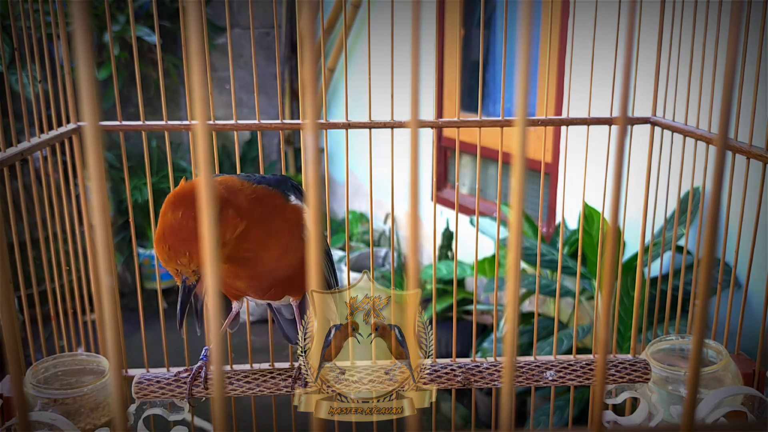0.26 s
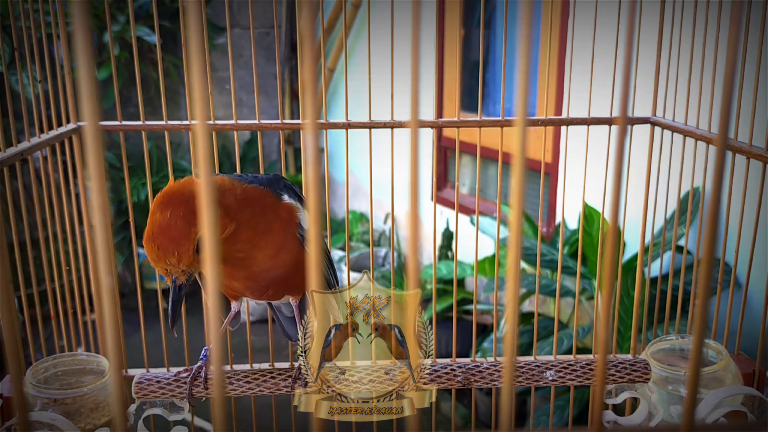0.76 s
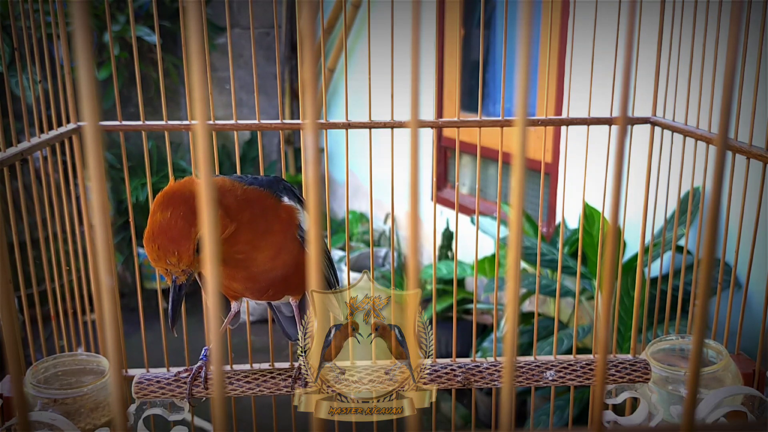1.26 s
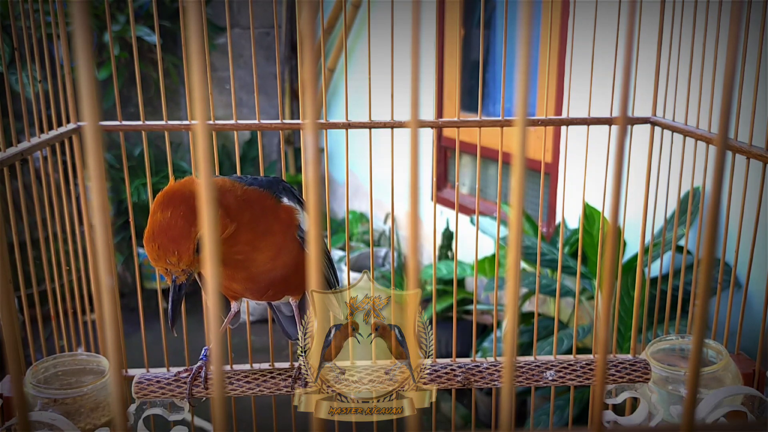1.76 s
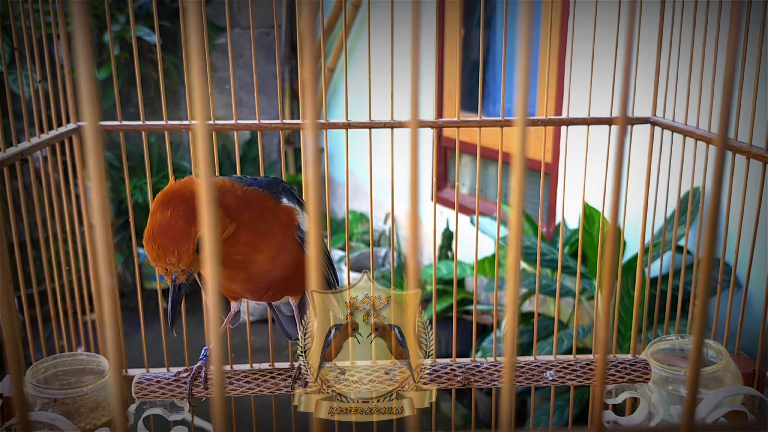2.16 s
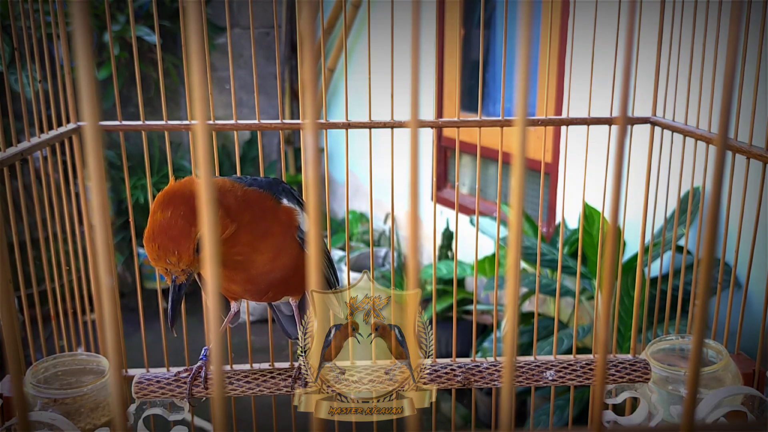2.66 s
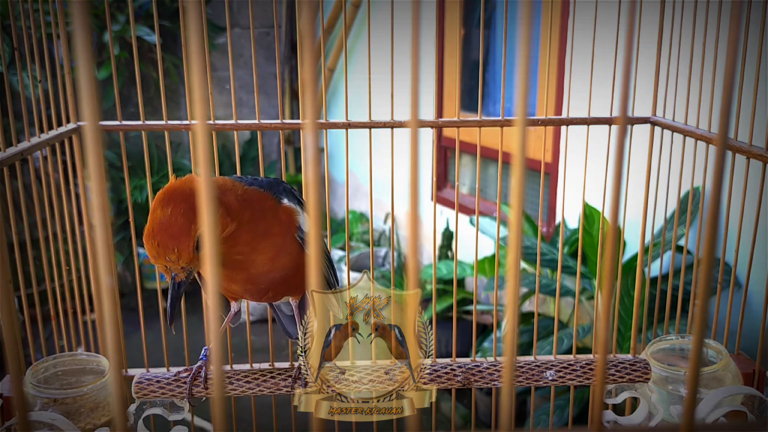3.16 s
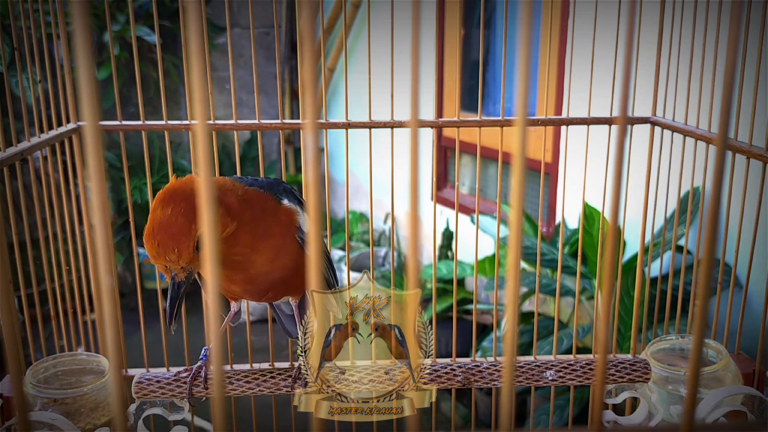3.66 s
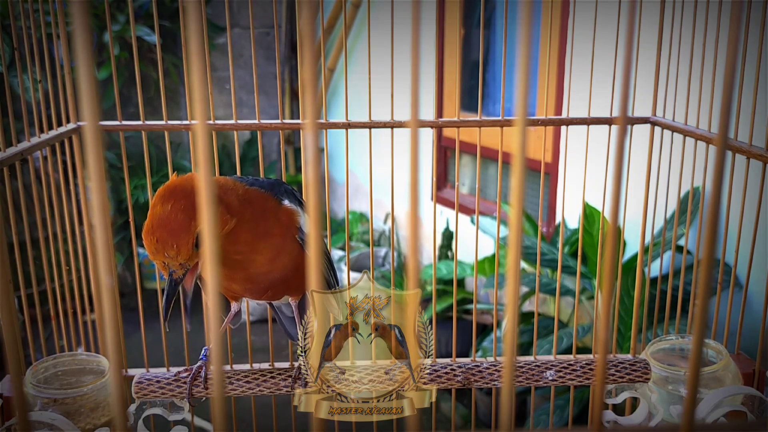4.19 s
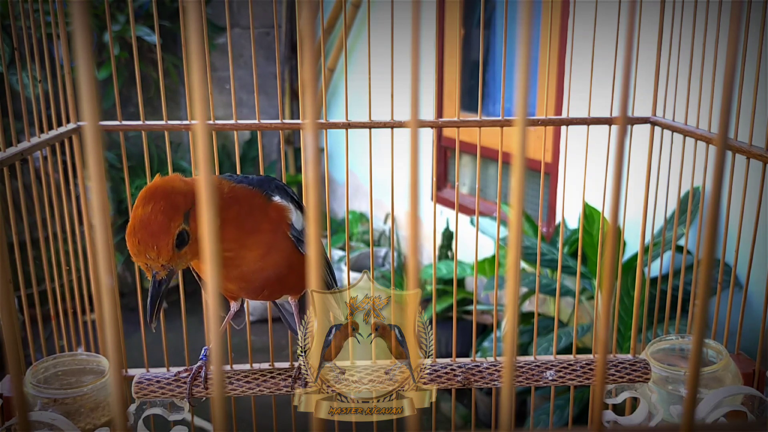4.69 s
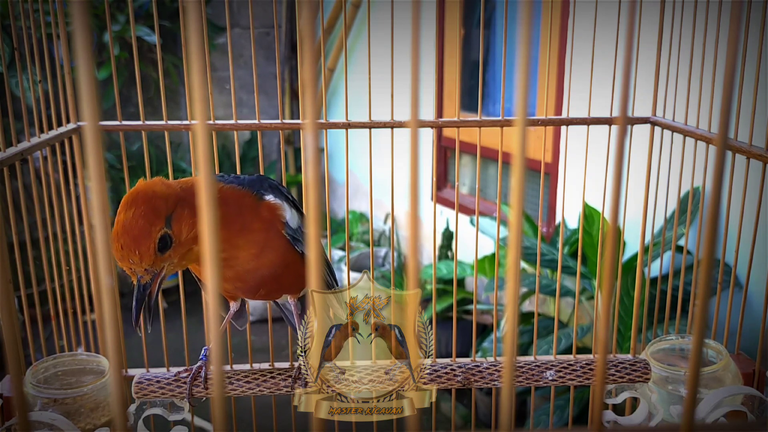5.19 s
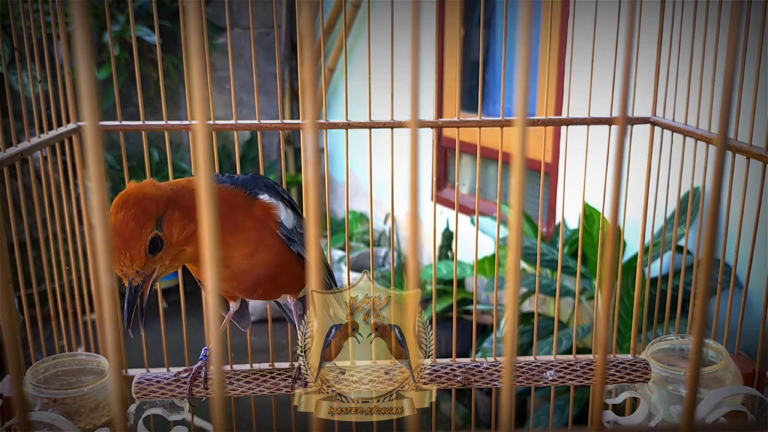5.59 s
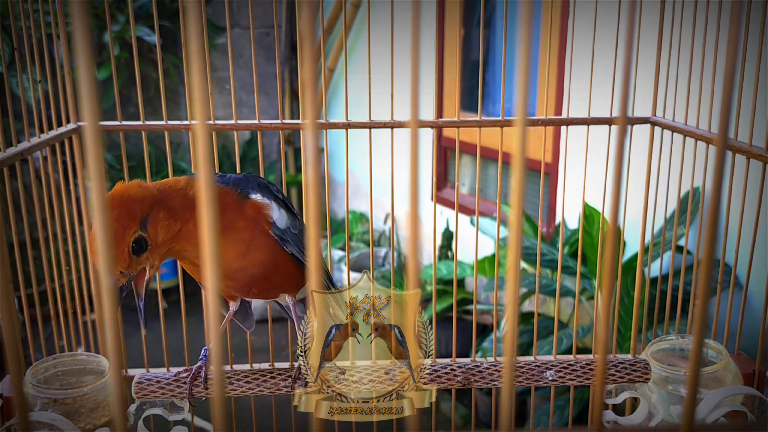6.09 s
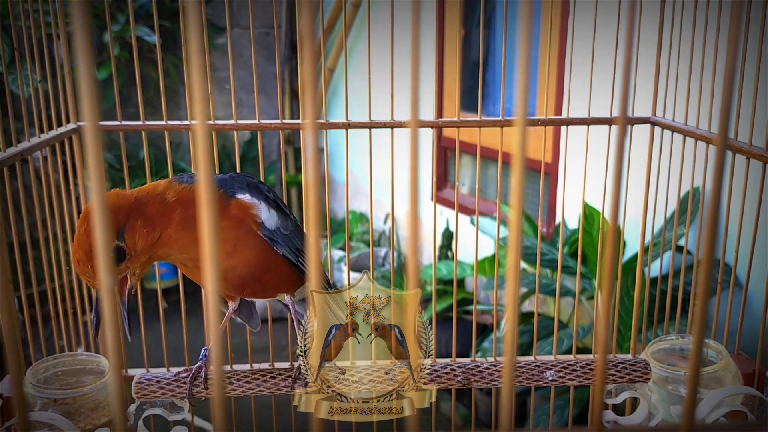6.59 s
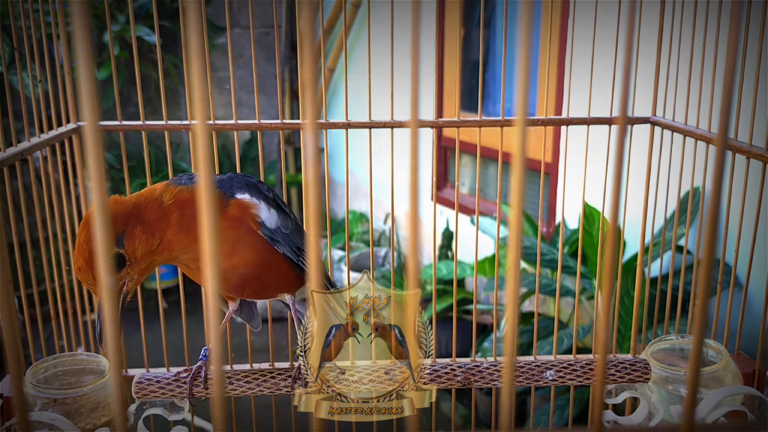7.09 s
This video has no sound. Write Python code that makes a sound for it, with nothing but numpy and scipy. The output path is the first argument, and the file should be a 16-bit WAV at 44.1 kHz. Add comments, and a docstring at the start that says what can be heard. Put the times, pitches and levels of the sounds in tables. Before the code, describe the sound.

A caged thrush very close to the microphone opens with a loud, high falling whistle, then stays silent for over two seconds while faint distant birds and soft wind bumps are heard. It resumes with quick piercing chirps and clicks, then falling sweeps, a fast warble and separate low trill notes. A far rooster crows midway. The walled yard adds short echoes over a quiet hush.

```python
"""A long whistle falls over a soft hush: a caged thrush sings close by in a walled yard.
Its later glides, quick sweeps and low trill are gliding sines with overtones, coloured by the throat and echoed.
Far roosters and songbirds call, as gliding sines too; light wind, made of low noise, bumps the microphone.
The hush is a sum of noise bands; a limiter ducks the whole scene for a moment after the loudest notes."""
import sys
import numpy as np
from scipy import signal
from scipy.io import wavfile
from scipy.ndimage import uniform_filter1d, minimum_filter1d

SR = 44100
rng = np.random.default_rng(int(sys.argv[2]) if len(sys.argv) > 2 else 0)


def unload_audio(sound):
    """Save the sound as a 16-bit wav file, at the path given as the first command line argument."""
    columns = np.transpose(np.atleast_2d(sound))
    # keep every value between -1 and 1, then stretch to whole-number steps
    steps = np.round(np.clip(columns, -1, 1) * 32767)
    wavfile.write(sys.argv[1], SR, steps.astype(np.int16))


def gain_from_db(level_db):
    """Convert decibel levels to linear amplitude factors (20 dB per decade)."""
    decades = np.asarray(level_db, float) / 20
    return 10 ** decades


N = 323694

# Levels in dB are relative: throat, echoes and later gains still act on them.

# Spectrum of the neighbourhood's hush. Each row: frequency in Hz, density in dB per Hz.
HUSH_SPECTRUM = [(12, -29), (20, -3), (145, -12), (247, -8), (477, -10.5), (555, -10.5), (615, -8.5),
                 (855, -5.5), (1160, -11.5), (1570, -13), (2820, -29.5), (5310, -18), (7390, -16.5),
                 (7970, 3), (8600, -18), (11200, -65), (18900, -120)]
# Course of the hush. Each row: time in seconds, level in dB.
HUSH_COURSE = [(0, -46), (1, -47), (3, -46.5), (5, -45), (6.4, -50), (6.8, -41.5), (7.34, -42)]

# Throat and beak pass high tones best. Each row: frequency in Hz, gain in dB.
THROAT_RESPONSE = [(1500, -41.5), (2200, -35.5), (3000, -28.5), (3600, -21.5), (4200, -10.5), (5000, -11),
                   (6000, -4.5), (7000, -5.5), (7600, -0.5), (8050, -1), (8500, -12)]
# Echoes off the cage bars and floor; the last, at 11 ms, comes off a nearby wall. Each row: delay in seconds,
# signed gain.
CAGE_ECHOES = [(.0013, -0.79), (.0029, 0.15), (.0047, 0.031), (.0074, 0.042), (0.0111, .22)]
# Long falling whistle. Each row: time in seconds, pitch in Hz, level in dB.
WHISTLE_CURVE = [(0.002, 7040, 6.5), (0.065, 6830, -3), (0.178, 6070, 3.5), (0.194, 6080, 1),
                 (0.21, 5965, -11), (0.268, 5720, -5), (0.359, 5630, -2), (0.418, 5480, -28)]

# How each kind of note bends and swells: top_at and loud_at are shares of its length, end_ratio is
# end pitch over turning pitch, bend is an exponent, attack_db and fade_db are the rise and fall in dB.
ARC_SHAPE = dict(top_at=0.34, end_ratio=0.71, bend=2.5, loud_at=0.19, attack_db=31.5, fade_db=23.5)
GLIDE_SHAPE = dict(top_at=0.67, end_ratio=0.96, bend=1.5, loud_at=0.51, attack_db=22, fade_db=14.5)
TICK_SHAPE = dict(top_at=.25, end_ratio=.53, bend=2.1, loud_at=.62, attack_db=8, fade_db=7)
HOOK_SHAPE = dict(top_at=0.14, end_ratio=0.41, bend=.62, loud_at=0.067, attack_db=19.5, fade_db=11)
SWELL_SHAPE = dict(top_at=1, end_ratio=1, bend=1.5, loud_at=0.99, attack_db=4.5, fade_db=13.5)
FAR_SHAPE = dict(top_at=.9, end_ratio=0.9, bend=0.86, loud_at=0.09, attack_db=0, fade_db=19)

# Thrush notes of each kind. Each row: start in seconds, length in seconds, start pitch in Hz,
# turning pitch in Hz, level in dB.
ARC_NOTES = [(3.439, .05, 3190, 5000, -6), (3.545, 0.023, 5850, 7390, 4), (3.642, 0.02, 6390, 7580, 6),
             (5.918, 0.027, 4215, 5410, -5.5)]
GLIDE_NOTES = [(3.062, 0.02, 6300, 7526, 6), (3.088, 0.021, 7180, 7490, -0.5),
               (3.444, 0.0073, 7220, 6980, -11.5), (4.018, .013, 5770, 6110, -2),
               (4.187, 0.012, 7100, 7000, 6), (4.351, 0.0079, 7080, 7220, 10),
               (4.372, 0.0031, 4900, 5835, -3), (5.245, 0.0094, 3750, 4460, -10.5),
               (6.469, 0.018, 3800, 3640, -22.5), (6.434, 0.0052, 7620, 7960, -8.5),
               (6.446, 0.0076, 8030, 7960, -8.5), (6.468, .02, 7700, 7216, -16.5),
               (6.436, 0.0076, 2750, 2380, -14.5), (6.472, 0.0092, 2390, 2370, -27)]
TICK_NOTES = [(3.904, 0.021, 2975, 3250, -10), (4.075, .016, 3700, 3150, -13.5),
              (4.25, 0.0063, 2407, 3020, -3.5)]
HOOK_NOTES = [(5.92, 0.14, 3580, 4276, -22), (6.04, 0.11, 3750, 4460, -15), (6.2, 0.1, 4400, 4420, -16.5)]
SWELL_NOTES = [(3.815, 0.0059, 2060, 2500, -9), (3.927, 0.006, 1485, 1634, 3),
               (5.848, .037, 1591, 3162, -6)]
# Runs sung once and a second voice above a hook, one list each.
# Each row: time in seconds, pitch in Hz, level in dB, overtone boost in dB.
RUN_CURVES = [
    [(2.902, 2780, -36.5, -12), (2.91, 3814, -14, 15), (2.92, 5000, -16, -4), (2.93, 5820, -8, -10),
     (2.94, 6110, -8, -18), (2.947, 6720, -36, -23)],
    [(3.822, 1623, -11, -11.5), (3.828, 2080, -15, 2), (3.833, 2494, -11, 10.5), (3.84, 3100, -10.5, 12.5),
     (3.85, 2980, -17, 15.5), (3.858, 3735, -10.5, 10), (3.864, 3864, -11, 12.5), (3.875, 5670, -9, -5)],
    [(4.672, 2577, -40, 17.5), (4.68, 3225, -13.5, 10.5), (4.687, 3565, -19, 37),
     (4.692, 3088, -75.5, 12.5), (4.697, 3616, -45, 37.5), (4.705, 3000, -14.5, 20), (4.72, 3463, -17, 4.5),
     (4.73, 3940, -19.5, 7)],
    [(6.04, 6770, -10, -45), (6.05, 5377, 2.5, -34), (6.058, 6220, -7.5, -40), (6.066, 4480, -7.5, -43)],
    [(6.197, 7690, -0.5, -37), (6.205, 6666, -3, -27), (6.222, 6450, -4, -34), (6.235, 4140, -17, -38)],
    [(6.434, 5380, -29, -26), (6.44, 5734, 1.5, -33), (6.45, 5000, -6.5, -45), (6.465, 4807, -11.5, -29),
     (6.485, 4936, -14, -35), (6.489, 4860, -1.5, -44)],
    [(6.489, 4210, -8.5, 17), (6.494, 3784, -8, 21), (6.499, 3790, -18, 8.5)],
]
# Climbing chirp. Each row: time after its start in seconds, pitch in Hz, level in dB, overtone boost in dB.
CHIRP_CURVE = [(0, 2246, -33, 0.5), (.006, 3303, -7, 12.5), (.014, 3500, -36, 26.5),
               (.023, 3865, -22, 35.5), (.031, 5210, -2.5, -1)]
# Chirps sung. Each row: start in seconds, length in seconds, level in dB.
CHIRP_NOTES = [(3.986, .024, 0), (4.157, 0.026, -2), (4.323, .028, 4)]
# Falling sweeps. Each row: start in seconds, start pitch in Hz, attack in seconds, level in dB,
# overtone boost in dB.
FALL_NOTES = [(5.174, 6247, 0.0029, -1, 2), (5.26, 6185, 0.022, 3, -24.5),
              (5.361, 6320, 0.035, -2.5, -32.5), (5.56, 7400, 0.0023, -6.5, -15.5),
              (5.65, 5910, 0.013, -3, -33)]
# Turning points of the warble. Each row: time in seconds, pitch in Hz, level in dB, overtone boost in dB.
WARBLE_TURNS = [(6.499, 3860, -11, -18), (6.516, 4483, -1, -4.5), (6.533, 3623, -1, -14.5),
                (6.557, 4534, -5, -35.5), (6.572, 3370, -8.5, -21), (6.592, 4113, -7, -35),
                (6.607, 4410, -12.5, -44.5), (6.624, 3025, -2.5, -21), (6.65, 4510, -16, -50),
                (6.662, 3760, -19.5, -33)]
# Trill notes. Each row: start in seconds, start pitch in Hz, held pitch in Hz, end pitch in Hz, level in dB.
TRILL_NOTES = [(6.72, 2647, 2066, 1670, -6.5), (6.843, 2418, 2002, 1735, -6.5),
               (6.967, 2357, 1984, 1693, -7.5), (7.097, 2308, 2014, 1772, -4.5),
               (7.248, 2545, 2025, 1997, -7)]
# Swelling of a trill note. Each row: share of its length, level in dB.
TRILL_SWELL = [(0, -2.5), (.12, 2), (.36, -9.5), (.58, -1), (.75, -3.5), (1, -11.5)]

# Overtones of each kind before the throat: dB of partial 1, 2, ..
ARC_DB, TICK_DB, HOOK_DB = [3.5, -29], [3.5, -5, 4], [2.5, 28.5]
TRILL_DB, SWELL_DB, CHIRP_DB, RUN_DB = [2.5, -9.5, -4.5, 3.5], [2.5, -19.5, -22, -37.5], [1.5, -1.5, -21], [0, -4, -0.5]
HOOK_THINS_DB = -83.5  # change of the hook's overtone as it falls

# Long crows of far roosters. Each row: time in seconds, pitch in Hz, level in dB.
LOW_CROW_CURVE = [(0.03, 321, -67), (0.15, 319.4, -45.5), (0.3, 313.5, -52.5), (0.55, 321.3, -56.5),
                  (0.739, 323, -60)]
THIN_CROW_CURVE = [(1.448, 1610, -60.5), (1.8, 1627, -50.5), (2.101, 1577, -63), (2.4, 1548, -59),
                   (2.899, 1480, -58)]
# Each row: time in seconds, pitch in Hz, level in dB, overtone boost in dB.
HIGH_CROW_CURVE = [(4.23, 756, -59, 15.5), (4.318, 748, -43.5, 10.5), (4.45, 710, -41.5, 6.5),
                   (4.55, 742, -47, 16), (4.651, 771.4, -30, -3), (4.801, 766, -43.5, 7),
                   (4.92, 784, -45, -6), (5.018, 720, -37.5, 5), (5.098, 693, -32.5, -4),
                   (5.181, 682, -23, -15), (5.269, 683, -28, 0), (5.32, 634, -59, 20),
                   (5.42, 626, -47.5, 1)]
LOW_CROW_DB, HIGH_CROW_DB = [-51.5, -3, 4, -6.5, -1, -28], [-2.5, -8.5, -19, -29]  # dB of partial 1, 2, ..
# Breath noise at the hoarse end of the first crow. Each row: time in seconds, level in dB.
BREATH_COURSE = [(.2, -68.5), (.32, -55), (.55, -55), (.72, -56), (.82, -84)]
# Short crow syllables. Each row: start in seconds, length in seconds, start pitch in Hz,
# end pitch in Hz, level in dB.
CLUCK_NOTES = [(3.95, 0.067, 1040, 1170, -46.5), (4.08, 0.06, 1200, 1230, -53.5),
               (4.42, 0.12, 1190, 1230, -47), (4.82, 0.18, 1130, 1200, -49.5),
               (5.24, 0.15, 1700, 1640, -51)]

# Far songbirds. Each row: start in seconds, length in seconds, start pitch in Hz,
# turning pitch in Hz, level in dB.
FAR_NOTES = [(0.12, 0.13, 4200, 3270, -45.5), (0.41, .13, 4145, 3194, -49), (0.69, 0.036, 5780, 3380, -46),
             (0.692, 0.035, 4550, 4400, -52), (0.78, 0.046, 3330, 4120, -51),
             (0.83, 0.034, 4000, 3750, -52), (0.95, 0.053, 4840, 4970, -37.5),
             (1.015, 0.044, 4530, 4490, -39), (1.06, 0.073, 4400, 4630, -43),
             (1.12, 0.098, 4850, 4920, -38.5), (1.23, 0.066, 4400, 4200, -47.5),
             (1.7, 0.24, 3100, 2560, -62.5), (1.86, 0.25, 3285, 3230, -58), (2.45, 0.13, 3540, 3100, -65.5),
             (5.09, 0.14, 4210, 3370, -47.5)]

# Wind on the microphone. Each row: start in seconds (the peak comes 0.03 s later), level in dB.
WIND_BUMPS = [(0.501, -60), (0.702, -47), (1.446, -38), (1.597, -35), (2.328, -40.5), (2.596, -50)]

YARD_T60_S, YARD_DB, NEAR_T60_S, NEAR_DB = 0.39, -8.5, 0.035, -8  # echoes, relative to the song
SMOOTH_DB, ROUGH_DB, ROUGH_PER_S, JITTER_SHARE = 1.52, 3.5, 140, 0.001  # tremble of level and pitch
FALL_S, FALL_FLOOR_HZ, FALL_SINK_S, FALL_ATTACK_DB, FALL_FADE_DB = 0.058, 3100, 0.022, 25, 8.5
FALL_OVERTONE_AT_S, FALL_OVERTONE_S = 0.038, 0.0049  # the overtone flares here, 1 dB down this far off
TRILL_S, TRILL_SETTLE_S, TRILL_HOLD_SHARE = 0.039, 0.007, 0.6
LIMIT_DB, HOLD_S, FALL_TIME_S, RECOVERY_TIME_S = 0, 0.072, 0.002, 0.003  # limiter
PORT_HZ, PORT_WIDTH_HZ, PORT_GAIN = 7686, 1580, 1.12  # resonance of the microphone port


def rms_one(x):
    """Normalisation: mean power becomes 1."""
    return x / np.sqrt(np.mean(x ** 2) + 1e-20)


def drift(rate_hz):
    """Low-passed noise: two equal poles leave slow random motion of rms 1."""
    r = np.exp(-2 * np.pi * rate_hz / SR)
    noise = rng.standard_normal(N + SR)
    return rms_one(signal.lfilter([1], [1, -2 * r, r * r], noise)[SR:])  # the first second settles the filter


def level(rows):
    """Envelope: gain along straight lines in dB over time."""
    s, db = np.transpose(rows)
    return gain_from_db(np.interp(np.arange(N) / SR, s, db))


def notes(tables, partials_db, edge_s, wobble, flutter_db, throat=((1, 0), (2, 0)), rounding=0.04):
    """Source and filter: harmonics of a gliding, trembling pitch are weighted by the throat's response."""
    out = np.zeros(N)
    for s, hz, db, *overtone_db in tables:
        at = np.arange(max(round((s[0] - edge_s) * SR), 0), min(round((s[-1] + edge_s) * SR), N))
        t = at / SR
        # muscles round the glide over a share of the note
        pitch = uniform_filter1d(np.interp(t, s, hz), size=int(rounding * len(t)) + 1, mode="nearest")
        phase = 2 * np.pi * np.cumsum(pitch * (1 + wobble[at])) / SR
        edge = np.clip(np.minimum(t - s[0], s[-1] - t) / edge_s + 1, 0, 1) ** 2
        for k, partial_db in enumerate(partials_db):
            boost_db = (k > 0) * sum(overtone_db)
            swell = np.interp(t, s, gain_from_db((db + boost_db) / 2)) ** 2
            colour_db = partial_db + np.interp((k + 1) * pitch, *np.transpose(throat))
            out[at] += edge * swell * gain_from_db(colour_db + flutter_db[at]) * np.sin((k + 1) * phase)
    return out


def echoes(x, t60_s):
    """Diffuse reverberation: convolution with exponentially dying noise of unit energy."""
    t = np.arange(SR) / SR
    tail = rng.standard_normal(SR) * gain_from_db(-60 * t / t60_s) * (t > 0.0006)
    return signal.fftconvolve(x, tail / np.sqrt(np.sum(tail ** 2)))[:N]


def bent(rows, top_at, end_ratio, bend, loud_at, attack_db, fade_db):
    """Frequency modulation: pitch eases to a turning point, then heads for its end; level swells and fades."""
    u = np.linspace(0, 1, num=25)
    top_at, loud_at = np.clip([top_at, loud_at], 0.02, 0.98)
    before = np.clip(1 - u / top_at, 0, 1)
    after = np.clip((u - top_at) / (1 - top_at), 0, 1)
    attack = np.clip(1 - u / loud_at, 0, 1) ** 2
    fade = np.clip((u - loud_at) / (1 - loud_at), 0, 1) ** 2
    swell_db = -attack_db * attack - fade_db * fade
    curves = []
    for s, length, start_hz, top_hz, db in rows:
        pitch = top_hz * (1 - (1 - end_ratio) * after ** bend) + (start_hz - top_hz) * before ** 2
        curves.append((s + length * u, pitch, db + swell_db))
    return curves


def hush(patchy_db):
    """Spectral shaping: third-octave bands of noise add up, each flickering a little."""
    out, edges = 0, 18 * 2 ** np.arange(0, 9.2, 1 / 3)
    # neighbouring bands differ in noise and flicker
    white, flicker = rng.standard_normal((2, N)), [drift(5.7) for k in range(4)]
    hz, db = np.transpose(HUSH_SPECTRUM)
    for k, (low, high) in enumerate(zip(edges, edges[1:])):
        band = signal.sosfilt(signal.butter(2, [low, high], "band", fs=SR, output="sos"), white[k % 2])
        band_db = np.interp(np.log(low * high) / 2, np.log(hz), db)
        out = out + gain_from_db(band_db + patchy_db * flicker[k % 4]) * band
    return level(HUSH_COURSE) * rms_one(out)


def breath_puffs(kinds):
    """Turbulence: each note sets in with a dying burst of high-passed noise."""
    onsets = np.zeros(N)
    for tables, _ in kinds:
        for s, hz, db, *overtone_db in tables:
            loudest_db = max(db + np.maximum(sum(overtone_db), 0))
            onsets[round(s[0] * SR)] += gain_from_db(loudest_db - 46.5)
    decay = np.exp(-1 / (0.002 * SR))
    puffs = signal.lfilter([1], [1, -decay], onsets) * rng.standard_normal(N)
    return signal.sosfilt(signal.butter(1, 3000, "high", fs=SR, output="sos"), puffs)


def thrush():
    """Modulation and reflection: notes tremble smoothly or harshly; cage, wall and yard echo them."""
    wobble = 0.002 * drift(40)
    hooks = [(s, hz, db, HOOK_THINS_DB * (s - s[0]) / (s[-1] - s[0]))
             for s, hz, db in bent(HOOK_NOTES, **HOOK_SHAPE)]
    whistles = [np.transpose(WHISTLE_CURVE)] + bent(GLIDE_NOTES, **GLIDE_SHAPE)
    runs = [np.transpose(rows) for rows in RUN_CURVES]
    smooth = [(whistles, [0]), (bent(ARC_NOTES, **ARC_SHAPE), ARC_DB), (hooks, HOOK_DB), (warble(), [0, 0])]
    harsh = [(bent(TICK_NOTES, **TICK_SHAPE), TICK_DB), (trills(), TRILL_DB),
             (bent(SWELL_NOTES, **SWELL_SHAPE), SWELL_DB),
             (chirps(), CHIRP_DB), (falls(), [0, 0]), (runs, RUN_DB)]
    smooth_db, rough_db = SMOOTH_DB * drift(60), ROUGH_DB * drift(ROUGH_PER_S)
    jitter = wobble + JITTER_SHARE * drift(ROUGH_PER_S)
    song = sum(notes(*kind, 0.001, wobble, smooth_db, THROAT_RESPONSE) for kind in smooth)
    song += sum(notes(*kind, 0.001, jitter, rough_db, THROAT_RESPONSE) for kind in harsh)
    song += breath_puffs(smooth + harsh)
    cage = sum(gain * np.pad(song, (round(s * SR), 0))[:N] for s, gain in CAGE_ECHOES)
    song = gain_from_db(0.5) * (song + cage)
    return song + gain_from_db(NEAR_DB) * echoes(song, NEAR_T60_S) + gain_from_db(YARD_DB) * echoes(song, YARD_T60_S)


def roosters():
    """Harmonic voices with unsteady pitch and breath noise, blurred by reverberation over distance."""
    wobble, flutter_db = 0.006 * drift(50), 3.0 * drift(25)
    thin = [np.transpose(THIN_CROW_CURVE)] + bent(CLUCK_NOTES, **SWELL_SHAPE)
    voices = [([np.transpose(LOW_CROW_CURVE)], LOW_CROW_DB),
              ([np.transpose(HIGH_CROW_CURVE)], HIGH_CROW_DB), (thin, [0])]
    crow = sum(notes(*voice, 0.02, wobble, flutter_db) for voice in voices)
    throat = signal.butter(2, [1150, 1850], "band", fs=SR, output="sos")
    breath = rms_one(signal.sosfilt(throat, rng.standard_normal(N)))
    crow = crow + level(BREATH_COURSE) * breath
    return gain_from_db(-2.5) * crow + gain_from_db(-9) * echoes(crow, 0.45)


def far_birds():
    """Ratio of direct to reverberant sound: distance leaves mostly reflections."""
    song = notes(bent(FAR_NOTES, **FAR_SHAPE), [0], 0.01, 0.005 * drift(60), 3.5 * drift(40))
    return gain_from_db(-6) * song + gain_from_db(2.5) * echoes(song, 0.48)


def wind():
    """Amplitude modulation of low noise: short bell-shaped puffs and a faint, lumpy rumble."""
    t = np.arange(N) / SR
    puffs = sum(gain_from_db(db) * np.exp(-((t - s - 0.03) / 0.014) ** 2) for s, db in WIND_BUMPS)
    lumps = gain_from_db(-61 + 0.48 * drift(2)) * np.exp(-((t - 2.3) / 1.7) ** 4)
    rumble = signal.sosfilt(signal.butter(2, [16, 70], "band", fs=SR, output="sos"), rng.standard_normal(N))
    return rms_one(rumble) * (0.58 * puffs + lumps)


def chirps():
    """Frequency modulation along one climbing figure, broken off sooner or later."""
    t, hz, shape_db, over_db = np.transpose(CHIRP_CURVE)
    curves = []
    for s, length, db in CHIRP_NOTES:
        u = np.linspace(0, length, num=25)
        curves.append((s + u, np.interp(u, t, hz), db + np.interp(u, t, shape_db), np.interp(u, t, over_db)))
    return curves


def falls():
    """Exponential relaxation: pitch sinks towards a floor while the level swells, then fades."""
    t = np.linspace(0, FALL_S, num=25)
    flare_db = -((t - FALL_OVERTONE_AT_S) / FALL_OVERTONE_S) ** 2
    curves = []
    for s, hz, attack_s, db, over_db in FALL_NOTES:
        pitch = FALL_FLOOR_HZ + (hz - FALL_FLOOR_HZ) * np.exp(-t / FALL_SINK_S)
        attack = np.clip(1 - t / attack_s, 0, 1) ** 2
        swell_db = db - FALL_ATTACK_DB * attack - FALL_FADE_DB * (t / FALL_S) ** 2
        curves.append((s + t, pitch, swell_db, over_db + flare_db))
    return curves


def warble():
    """Cosine modulation: pitch and level swing between turning points along half a cosine."""
    s, *columns = np.transpose(WARBLE_TURNS)
    t = np.linspace(s[0], s[-1], num=120)
    turn = np.interp(t, s, np.arange(len(s)))
    eased = np.floor(turn) + 0.5 - 0.5 * np.cos(np.pi * (turn % 1))
    return [(t, *(np.interp(eased, np.arange(len(s)), c) for c in columns))]


def trills():
    """Relaxation to a held pitch that then sags, in low notes whose level swells twice."""
    u = np.linspace(0, 1, num=30)
    settle = np.exp(-u * TRILL_S / TRILL_SETTLE_S)
    sag = np.clip((u - TRILL_HOLD_SHARE) / (1 - TRILL_HOLD_SHARE), 0, 1)
    swell_db = np.interp(u, *np.transpose(TRILL_SWELL))
    curves = []
    for s, start_hz, held_hz, end_hz, db in TRILL_NOTES:
        pitch = held_hz + (start_hz - held_hz) * settle - (held_hz - end_hz) * sag
        curves.append((s + u * TRILL_S, pitch, db + swell_db))
    return curves


def scene():
    """Superposition: the pressures of all sources add at one microphone."""
    return (thrush() + far_birds() + roosters() + hush(patchy_db=1.87) + wind())[None]


def limiter(x):
    """Gain control: gain drops within milliseconds of a peak, holds, then springs back."""
    hold = int(HOLD_S * SR)
    want_db = np.minimum(LIMIT_DB - 20 * np.log10(np.abs(x) + 1e-9), 0)
    held_db = minimum_filter1d(want_db, hold, origin=(hold - 1) // 2)  # looks back only
    fall, rise = np.exp(-1 / (FALL_TIME_S * SR)), np.exp(-1 / (RECOVERY_TIME_S * SR))
    fast_db = signal.lfilter([1 - fall], [1, -fall], held_db)
    slow_db = signal.lfilter([1 - rise], [1, -rise], held_db)
    return x * gain_from_db(np.minimum(fast_db, slow_db))  # the lower gain: quick to fall, slower to recover


def top_cut(x):
    """Nothing passes above the cut-off."""
    return signal.sosfilt(signal.butter(12, 9180, fs=SR, output="sos"), x)


def record(dry):
    """Resonance, low-pass filtering and saturation: port, top cut, limiter, overload, further cuts."""
    x = dry + PORT_GAIN * signal.lfilter(*signal.iirpeak(PORT_HZ, PORT_HZ / PORT_WIDTH_HZ, fs=SR), dry)
    x = signal.sosfilt(signal.cheby2(10, 60, 9461.885, fs=SR, output="sos"), x)
    x = 0.88 * np.tanh(limiter(x) / 0.88)  # overload on what slips past the limiter
    x = signal.sosfilt(signal.cheby2(5, 32, 9620.8, fs=SR, output="sos"), x)
    x = signal.sosfilt(signal.butter(4, 9600, fs=SR, output="sos"), x)
    return top_cut(x)


dry = scene()
out = record(dry)
unload_audio(out)
```